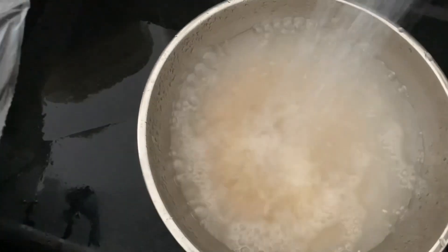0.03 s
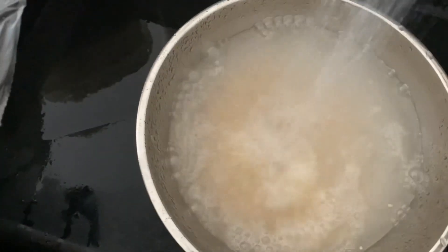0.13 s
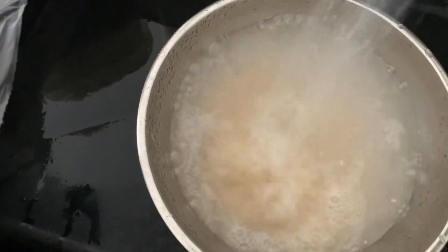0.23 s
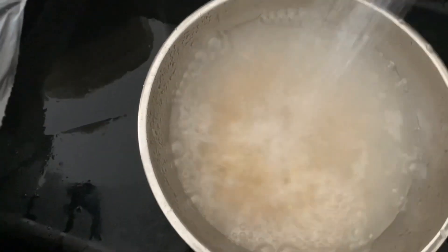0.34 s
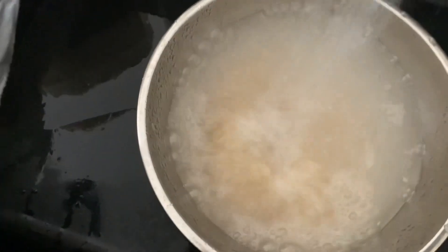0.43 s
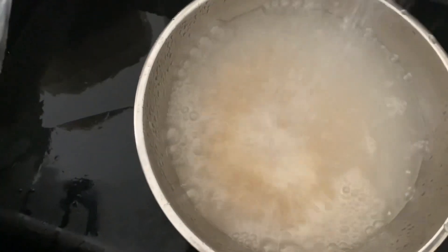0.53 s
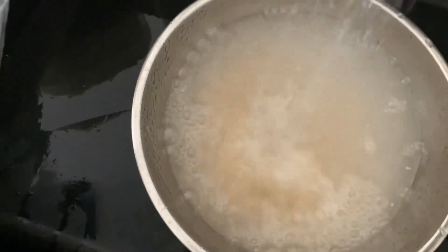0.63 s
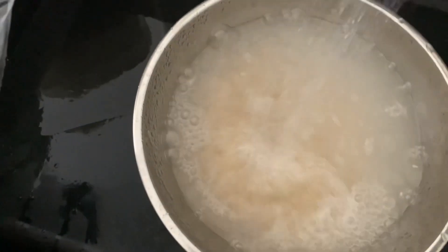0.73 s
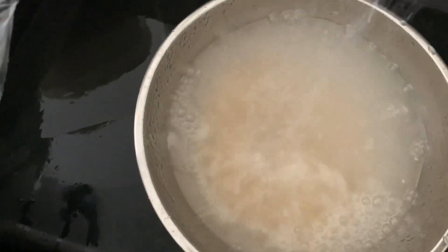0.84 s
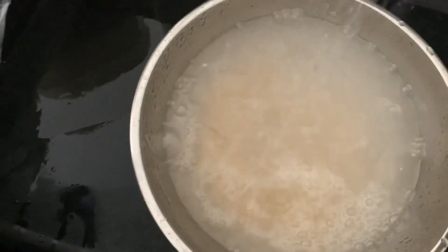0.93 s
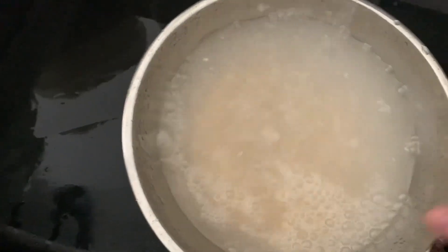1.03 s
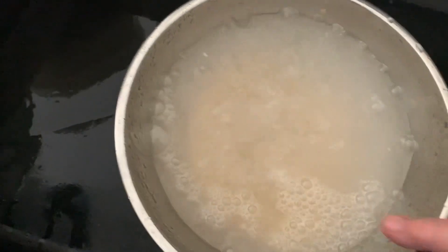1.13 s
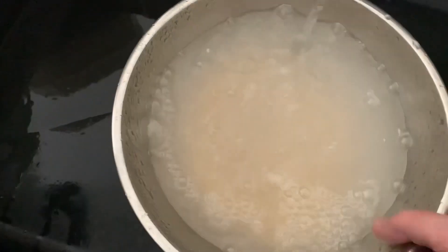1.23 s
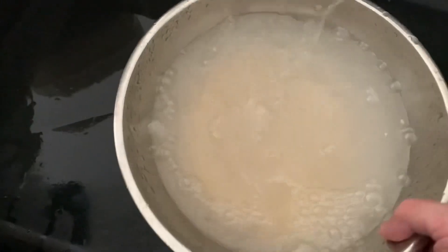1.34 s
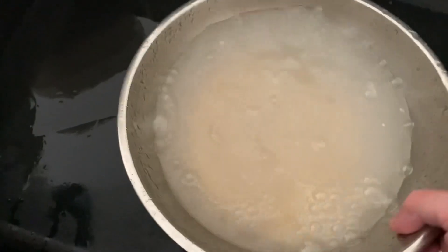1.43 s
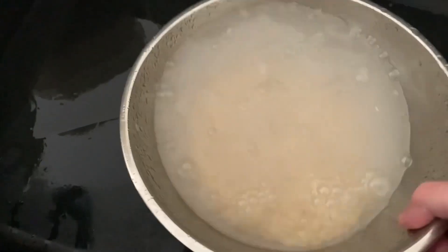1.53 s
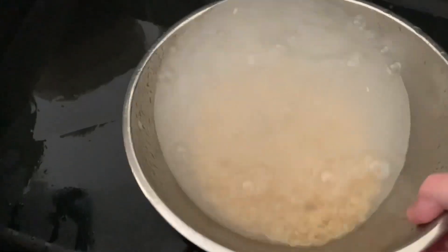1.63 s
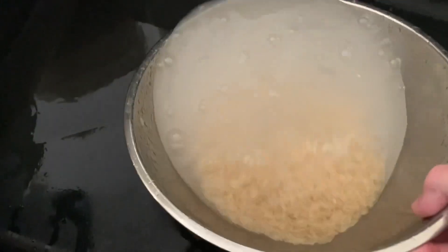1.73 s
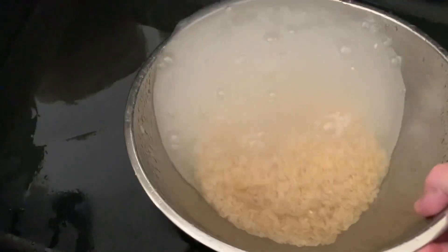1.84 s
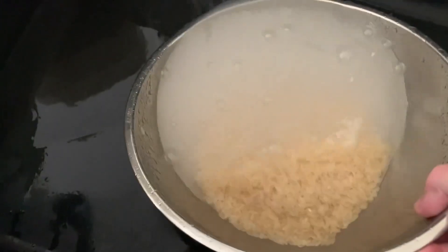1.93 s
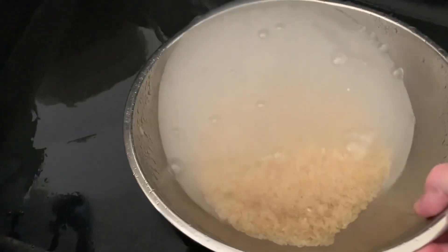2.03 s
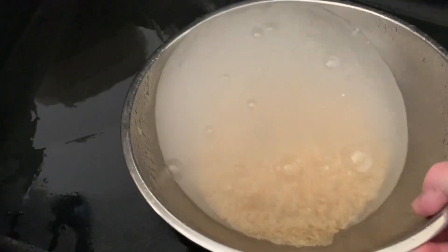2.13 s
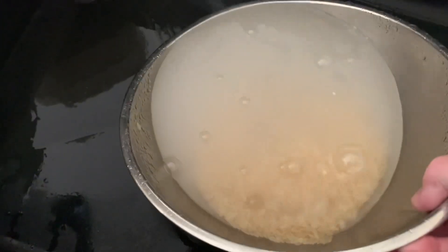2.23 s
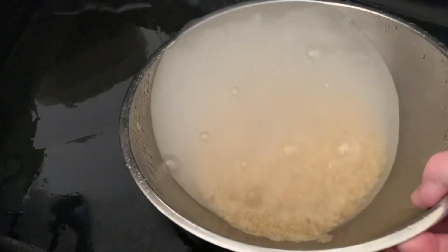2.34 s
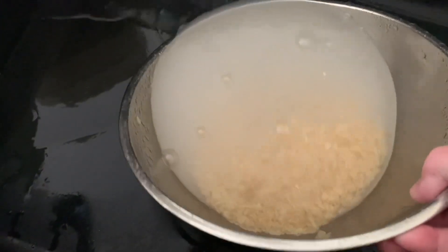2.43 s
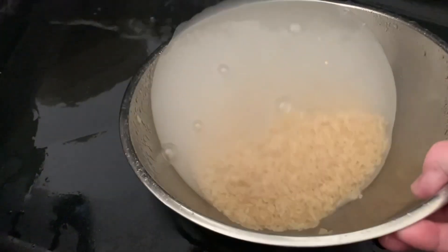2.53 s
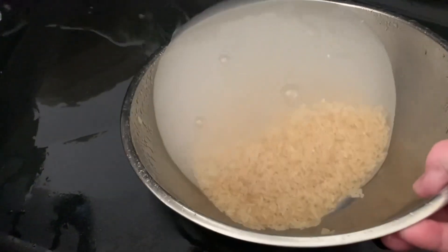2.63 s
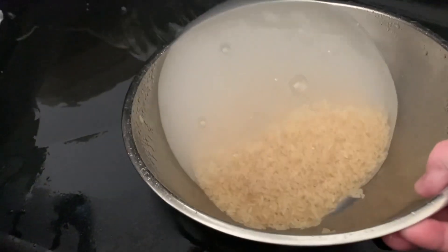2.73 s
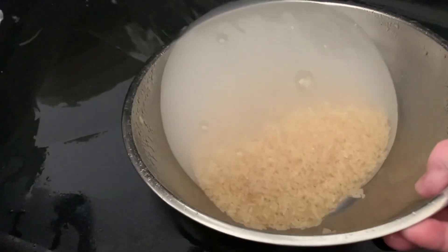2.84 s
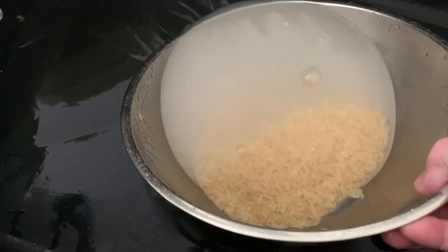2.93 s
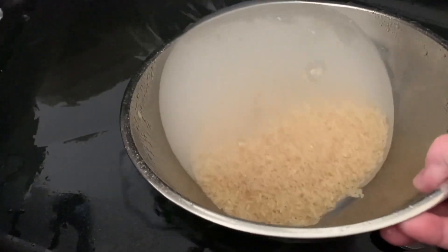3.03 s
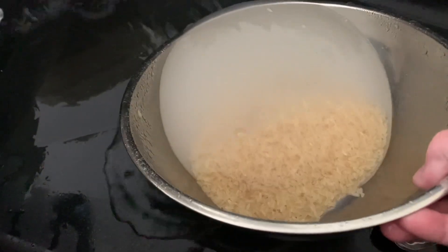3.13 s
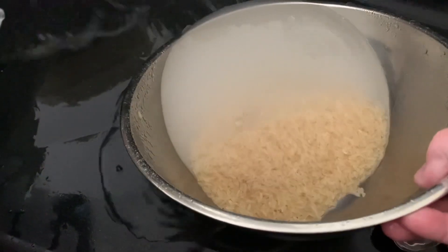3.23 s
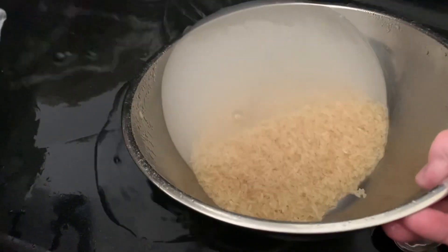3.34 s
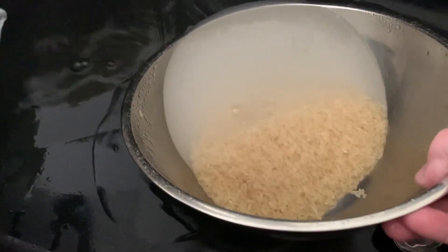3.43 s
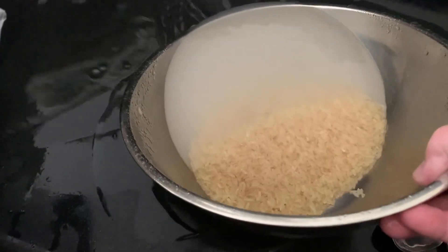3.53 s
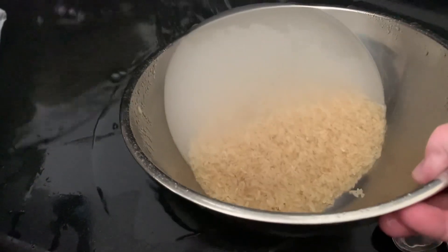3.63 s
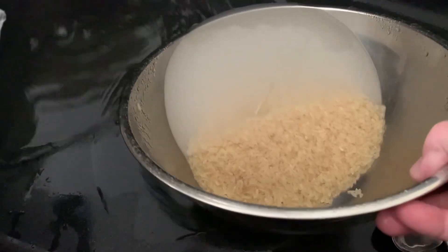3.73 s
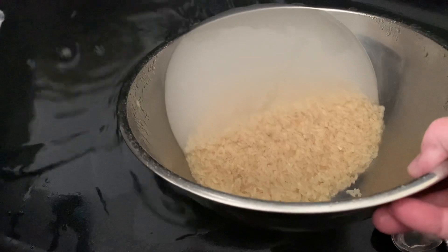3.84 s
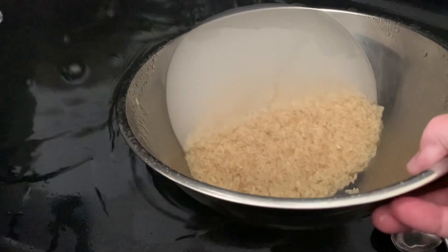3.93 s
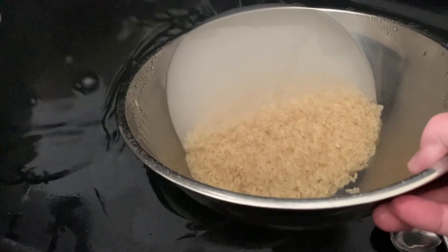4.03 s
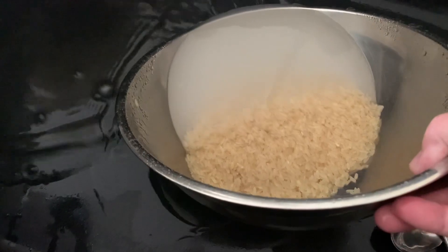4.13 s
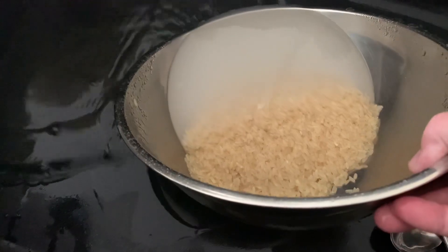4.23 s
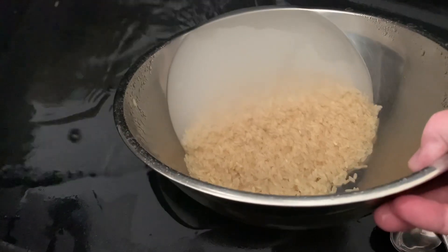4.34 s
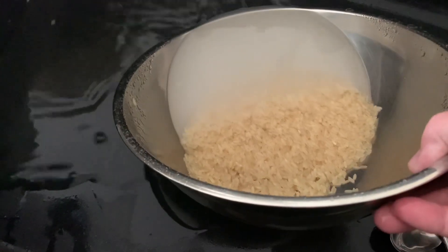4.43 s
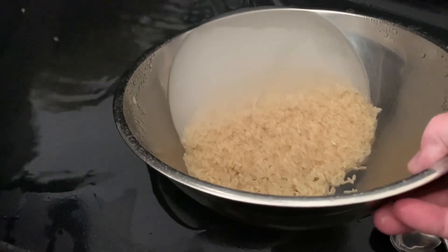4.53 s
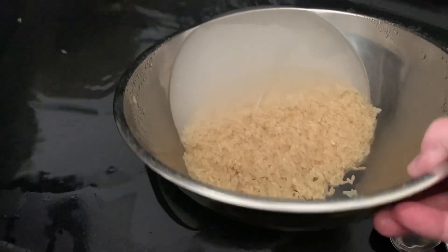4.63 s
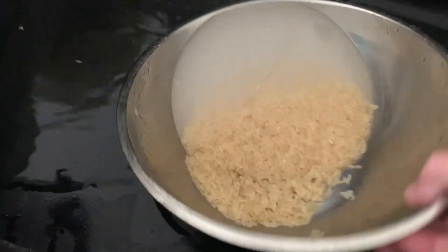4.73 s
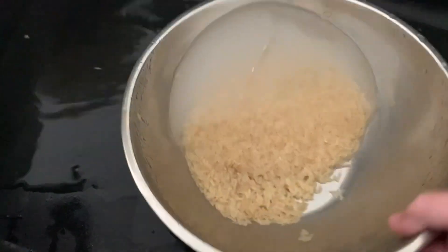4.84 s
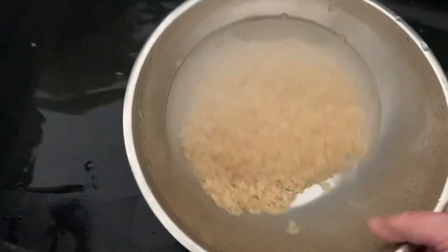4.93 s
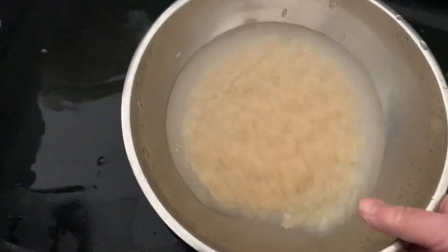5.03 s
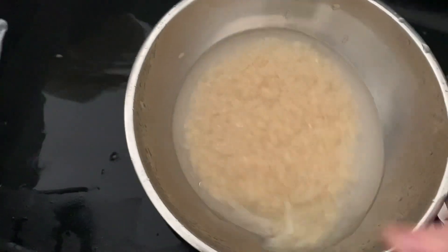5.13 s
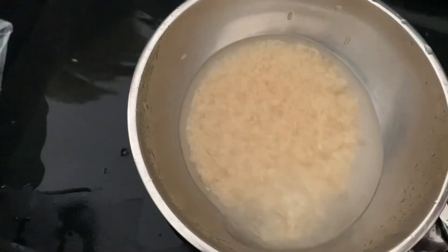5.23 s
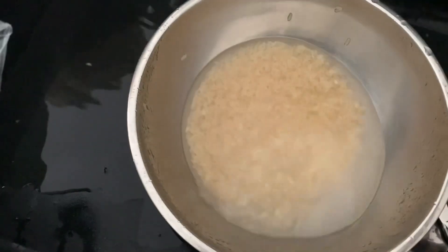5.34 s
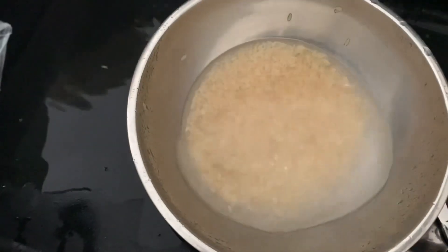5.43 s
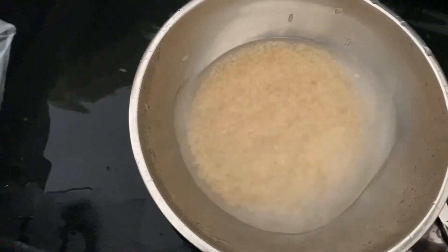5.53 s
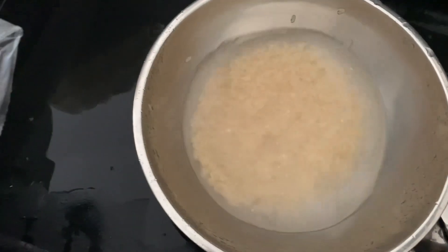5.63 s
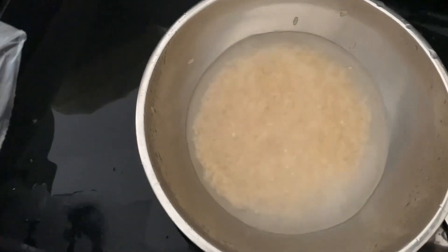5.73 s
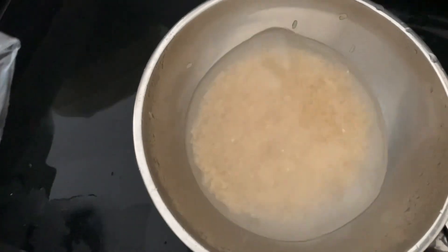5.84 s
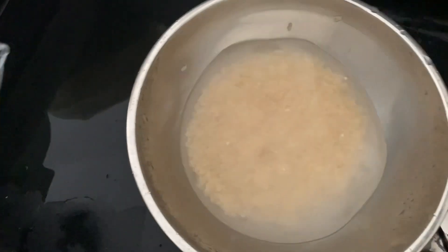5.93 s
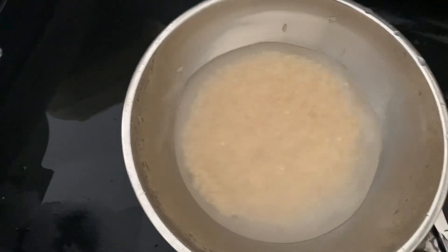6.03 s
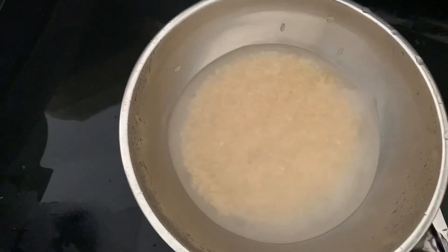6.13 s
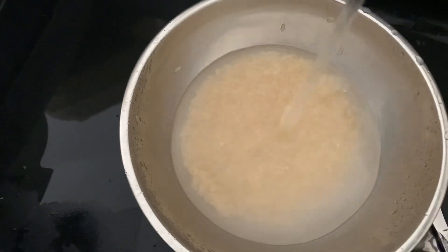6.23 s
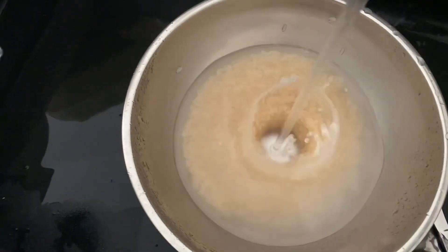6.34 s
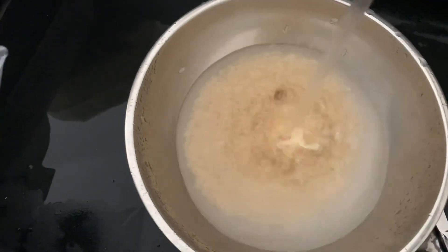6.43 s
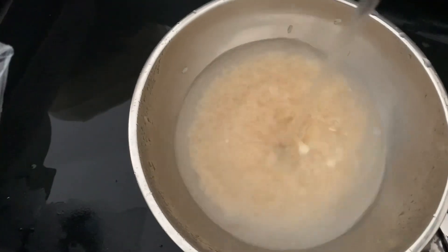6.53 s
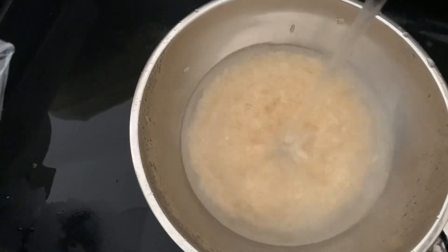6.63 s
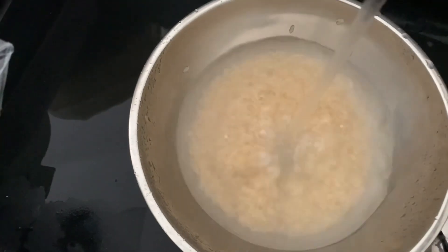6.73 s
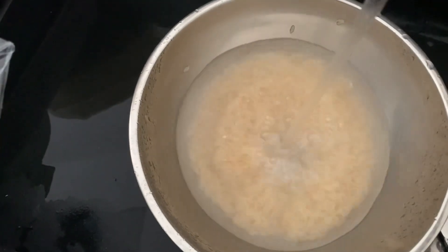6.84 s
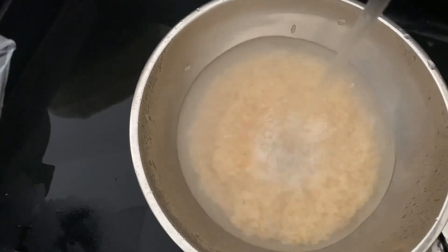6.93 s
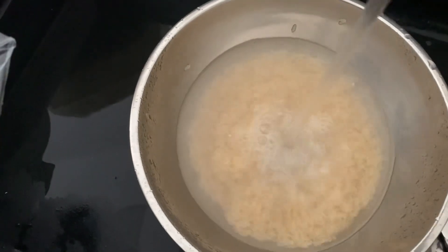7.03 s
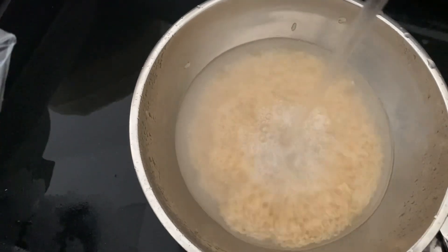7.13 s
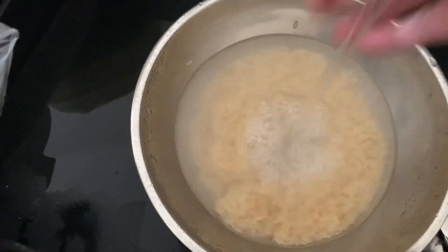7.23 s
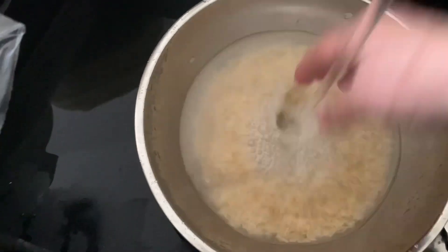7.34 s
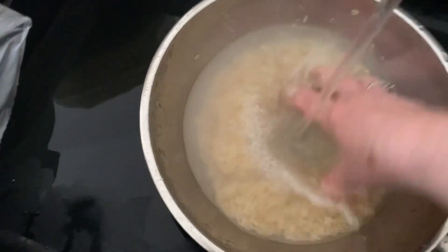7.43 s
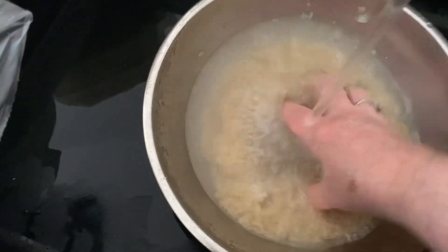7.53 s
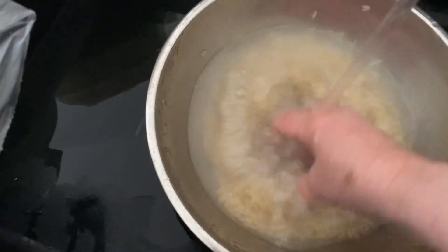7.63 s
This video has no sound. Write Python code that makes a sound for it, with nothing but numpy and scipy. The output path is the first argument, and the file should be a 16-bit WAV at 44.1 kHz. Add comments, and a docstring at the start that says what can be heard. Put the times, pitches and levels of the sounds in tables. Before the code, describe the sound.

Bubbly tap water fills a metal bowl and shuts off; quiet draining drips and foam pops, a bowl clunk, then a fresh jet and hand splashes.

```python
"""A tap pours into a steel bowl of rice and water, bubbles over froth, and closes amid a knock and smacks.
Foam fizzes out; the tipped bowl dribbles into the sink: ringing plops, gurgles, foam pops, shifting grains.
The bowl is set down, a decaying ring over a noise thud; the tap then spits and pours on shallow rice.
A hand plunges into that jet, with louder bubbles, splashes and a jolt of the bowl.
Throughout, a fan hums and hisses in filtered noise, and short noise tails answer as a small kitchen."""
import sys
import numpy as np
from scipy import signal
from scipy.fft import rfft, irfft, next_fast_len
from scipy.io import wavfile
from scipy.ndimage import map_coordinates

SR = 44100
rng = np.random.default_rng(int(sys.argv[2]) if len(sys.argv) > 2 else 0)


def digitize_waveform(pressure):
    """Quantize a signal to 16-bit integers and store it at the path in sys.argv[1].

    Rows of a 2-D input are taken as channels; values are limited to [-1, 1].
    """
    field = np.atleast_2d(pressure).T
    bounded = np.clip(field, -1, 1)
    quanta = np.round(bounded * 32767).astype(np.int16)
    wavfile.write(sys.argv[1], SR, quanta)


N = 339129
TIME = np.arange(N) / SR

# colour of the pour into the deep bowl: (frequency [Hz], relative level per Hz [dB])
DEEP_COLOUR = [(90, 9.5), (200, -2.5), (280, -7), (400, -8.5), (1500, 0.5), (1900, -4.5), (2500, -0.5),
               (4000, 5), (5500, 4), (7500, 6.5), (12000, 6), (15500, 2)]
# colour of the pour onto shallow rice: (frequency [Hz], relative level per Hz [dB])
SHALLOW_COLOUR = [(90, 8), (250, 0.5), (500, -1.5), (1500, -1), (3200, 3.5), (5000, -0.5), (6450, 3.5),
                  (7200, 0.5), (10000, -5.5), (12600, -5.5), (15500, -13)]
# resonances and dips of the bowl and the sink: (centre [Hz], width [Hz], lift [dB])
HOLLOW_MODES = [(480, 164, 10), (930, 52, 4.5), (1183, 49, 5), (1490, 240, 7.5), (1890, 90, -5),
                (2057, 79, 5.5), (3040, 110, -6.5)]
# bubbles trapped by a drop, the jet or the hand: (time [s], peak before trim [dB], starting pitch [Hz])
PLOP_HITS = [(0.688, -24.5, 1226), (0.745, -25.5, 2400), (0.772, -21.5, 1268), (0.954, -24.5, 1453),
             (0.988, -30, 1500), (1.032, -33, 1395), (1.14, -31, 1127), (1.288, -28, 1340),
             (2.029, -40, 1740), (2.766, -25, 1264), (2.795, -26.5, 1490), (2.862, -41.5, 730),
             (3.549, -39, 1620), (4.021, -33, 950), (4.09, -39, 935), (4.11, -35.5, 1650),
             (4.208, -31, 1130), (4.212, -32, 1646), (4.278, -34, 946), (4.288, -38, 695),
             (4.316, -34, 716), (4.345, -32.5, 1090), (4.373, -32, 1020), (4.413, -35.5, 570),
             (4.427, -34, 977), (4.527, -37.5, 853), (4.823, -36, 1106), (4.945, -32, 360),
             (6.324, -16.5, 1233), (6.78, -22, 2620), (6.799, -25.5, 2040), (6.919, -26.5, 2064),
             (7.177, -23.5, 940), (7.298, -23.5, 2830), (7.352, -12.5, 3400), (7.374, -17.5, 1512),
             (7.479, -25, 1351), (7.631, -23, 1630)]
# foam bubbles and droplets ticking on the steel: (time [s], peak before trim [dB], starting pitch [Hz])
TICK_HITS = [(1.004, -21, 10500), (1.269, -31, 7400), (1.705, -46, 12200), (1.924, -31.5, 4970),
             (2.029, -35, 7400), (2.2303, -36.5, 6830), (2.571, -38, 10700), (2.7658, -29.5, 3420),
             (2.904, -32, 5250), (3.215, -31.5, 5960), (3.232, -36.5, 4630), (3.637, -46, 11000),
             (3.812, -35.5, 3500), (3.8918, -33, 4120), (4.023, -33.5, 6730), (5.032, -31, 6060),
             (6.235, -31, 12000), (7.317, -18, 11390)]
# water smacking the surface or the hand: (time [s], peak before trim [dB], noise centre [Hz])
SMACK_HITS = [(0.533, -13.5, 3470), (1.2305, -8, 6900), (4.527, -37, 2000), (6.2824, -14.5, 5500),
              (6.324, -13.5, 2400), (7.35, -11, 3800), (7.372, -16, 2800)]
# bowl bumping the sink and rebounding, or jolted by the hand:
# (time [s], peak before trim [dB], thud against ring before trim [dB])
KNOCK_HITS = [(0.452, -21, 5), (4.801, -30.5, -28), (4.823, -33, -20), (5.812, -20, -9.5), (7.425, -21, 2)]
# modes of the loaded bowl: (frequency [Hz], level before random scatter [dB], t60 [s])
BOWL_MODES = [(197, -2.5, 0.11), (376, 0.5, 0.074), (445, 1.5, 0.11), (593, 1, 0.037), (680, 0, 0.067)]
# colour of the fan's rumble: (frequency [Hz], relative level [dB])
RUMBLE_COLOUR = [(20, -54), (45, -16), (70, -10), (105, -1), (165, -2.5), (260, -18), (350, -20),
                 (500, -42)]
# colour of the fan's air: (frequency [Hz], relative level [dB])
HISS_COLOUR = [(100, -21), (330, 1), (460, 8.5), (650, -1), (900, 2), (1200, 0), (1700, 4.5), (2600, -1.5),
               (4100, -12), (5100, -10.5), (6000, -12.5), (7200, -17), (9000, -22), (15500, -57)]
# gain of the rumble and drone over time: (time [s], gain before trims [dB])
RUMBLE_GAIN = [(0, -47.5), (1.5, -43.5), (3.1, -44), (6.15, -39), (6.7, -40)]
# decay of the room: (frequency [Hz], t60 [s])
ROOM_DECAY = [(150, 0.29), (1000, 0.095), (4000, 0.091), (14000, 0.062)]
# gain of the room's answer: (frequency [Hz], gain [dB])
ROOM_GAIN = [(100, -18.5), (280, -11), (600, -1), (1200, -4.5), (2200, -2.5), (3500, -3), (6500, -5.5),
             (12000, -11)]
# stereo tilt of the microphone: (frequency [Hz], left minus right [dB])
STEREO_LIFT = [(40, -2), (125, 4.5), (300, 2), (1200, 2), (4000, -0.5)]
# the flow to this power is the gain of one bubble size: [large, small, spray]
FLOW_EXPONENTS = [2.0, 1.4, 0.97]
# foam fizzing out after the pour, then wet rice shifting as the bowl is tipped and levelled:
# (time [s], level [dB], rise [s], settling [s])
FIZZ_AND_RICE = [(1.25, -51.5, .15, .55), (2.851, -57.5, .15, .5), (4.76, -52, .1, .13),
                 (5.01, -50.5, .12, .07)]
# bubble runs from the thinning jet, the sloshing, the filling pool and the splashing hand:
# (start [s], length [s], peak before scatter [dB], first pitch [Hz], last pitch [Hz], before scatter)
GURGLE_RUNS = [(.87, 0.17, -35, 1244, 1477), (1.057, 0.068, -36, 2180, 1490), (5.01, .09, -42, 520, 615),
               (6.769, 0.16, -33.5, 2000, 2630), (7.14, 0.069, -32, 1040, 863),
               (7.335, .055, -23, 1864, 1505), (7.455, 0.046, -28.5, 945, 1550),
               (7.55, 0.12, -26, 1100, 1500)]
# flurries of fainter foam bubbles while the bowl is tipped:
# (start [s], length [s], peak before scatter [dB])
FOAM_RUNS = [(1.803, .38, -42.5), (2.681, 0.35, -39), (3.1, 0.93, -45)]

CLOSE_S, SHUT_S = .47, 1.2  # the tap starts closing, and is shut
SPIT_S, SPIT_DB, SPIT_DECAY_S = 6.25, -7.5, .035  # the opening tap spits once
LAND_S, JET_RISE_S = 6.322, .022  # then the full jet lands
BARE_DB, COVER_S = [3.5, 4, 11], .43  # lift on bare rice (large, small, spray), gone once a pool covers it
HAND_S, REACH_S, HAND_DB = 7.15, .42, [3, 4.5, 3.5]  # hand enters the jet; lift (large, small, spray)
GURGLES_PER_S, GURGLE_SCATTER_DB, GURGLE_OCTAVES = 110, 1, .16
POPS_PER_S, POP_SCATTER_DB, POP_HZ, POP_OCTAVES = 42, 2.5, 5370, 0.553
TOP_HZ = 15850  # upper limit of the microphone


def amp(db):
    """Decibels to gain."""
    return 10 ** (np.asarray(db) / 20)


def unit(x):
    """Scaled to rms 1."""
    return x / np.sqrt(np.mean(x ** 2) + 1e-20)


def along(points, hz):
    """A frequency curve read on a log axis."""
    f, v = np.transpose(points)
    return np.interp(np.log(hz + 1), np.log(f + 1), v)


def wobble(rate):
    """A smooth random curve, rate knots a second."""
    return map_coordinates(rng.standard_normal(int(N * rate / SR) + 4), [TIME * rate])


def ramp(start_s, length_s):
    """Rises steadily from 0 to 1 over the given time."""
    return np.clip((TIME - start_s) / length_s, 0, 1)


def swell(s, rise_s, fall_s):
    """A gain that grows to 1 at time s and dies away."""
    return np.exp(-np.maximum((s - TIME) / rise_s, (TIME - s) / fall_s))


def filtered(x, response):
    """x shaped by a response of frequency."""
    n = x.shape[-1]
    m = next_fast_len(n + 8192)
    return irfft(rfft(x, m) * response(np.fft.rfftfreq(m, 1 / SR)), m)[..., :n]


def band(hz, lo_hz, hi_hz):
    """A steep band-pass gain."""
    return ((1 + (lo_hz / (hz + 1)) ** 12) * (1 + (hz / hi_hz) ** 12)) ** -.5


def resonance(hz, centre_hz, q):
    """Causal response of one resonance."""
    damping = 1j * hz * centre_hz / q
    return damping / (centre_hz ** 2 - hz ** 2 + damping)


def add(track, s, db, sound):
    """Mixes a sound into the track at time s with the given peak level."""
    part = track[max(round(s * SR), 0):][:len(sound)]
    part += (amp(db) * sound / np.abs(sound).max())[:len(part)]


def scatter(start_s, length_s, per_s):
    """Uneven times one after another through a stretch, each with normal draws for size and pitch."""
    count = max(round(length_s * per_s), 1)
    times = start_s + length_s * (np.arange(count) + rng.random(count)) / count
    return zip(times, *np.clip(rng.standard_normal((count, 2)), -2, 2).T)


def bubble(t, hz, cycles, rise):
    """A bubble rings for some cycles, its pitch rising as it nears the surface."""
    age = t * hz / cycles
    phase = 2 * np.pi * hz * t * (1 + rise * np.minimum(age, 2) / 2)
    return np.sin(phase) * np.exp(-2 * age)


def burst(t, centre_hz, q, attack, t60, tail_db, tail_t60):
    """A short swell of noise and its weaker tail in one resonance."""
    decay = amp(-60 * t / t60) + amp(tail_db - 60 * t / tail_t60)
    envelope = decay * (1 - np.exp(-(t / attack) ** 2))
    noise = envelope * rng.standard_normal(len(t))
    return filtered(noise, lambda hz: resonance(hz, centre_hz, q))


def ping(t, hz, crack_db=1):
    """A tiny bubble bursting: a broad crack and a short high note."""
    ring = bubble(t, hz, cycles=15.0, rise=0.028) * (1 - np.exp(-(t / .001) ** 2))
    crack = burst(t, hz, q=1.04, attack=0.0016, t60=0.006, tail_db=-20, tail_t60=0.044)
    return unit(ring) + amp(crack_db) * unit(crack)


def swarm(flow, lo_hz, hi_hz, rate, cycles, spread_db, rise):
    """Bubbles across a pitch range, equally strong per Hz; the weaker the flow, the fewer are born."""
    busy = flow / flow.max()
    total = np.cumsum(busy)
    when, pitch, size = rng.random((int(rate * total[-1] / SR), 3)).T
    start = np.searchsorted(total, when * total[-1])
    hz = lo_hz * (hi_hz / lo_hz) ** pitch
    k = np.arange(int(2 * cycles * SR / lo_hz))
    size_gain = amp(-spread_db * np.log(1 - .97 * size))
    strength = hz * size_gain / np.sqrt(busy[start])
    rings = strength[:, None] * bubble(k / SR, hz[:, None], cycles, rise)
    rings *= 1 - np.exp(-k / SR * hz[:, None])  # a bubble takes a cycle to start
    x = np.bincount((start[:, None] + k).ravel(), rings.ravel(), N)[:N]
    return x * np.sqrt(total[-1] / np.sum(x ** 2 * busy))  # rms 1, weighted by the flow


def tap_closing():
    """Gains of large bubbles, small bubbles and spray: as the flow drops, the large ones fade fastest."""
    flow = 1 - ramp(CLOSE_S, SHUT_S - CLOSE_S)
    return [flow ** power for power in FLOW_EXPONENTS]


def hollow(hz):
    """Lift in dB of the air in the bowl and the sink."""
    return sum(db / (1 + (2 * (hz - centre) / width) ** 2) for centre, width, db in HOLLOW_MODES)


def pour(gains, colour, bubbles_per_s, large_db, small_db, spray_db, froth_db, flutter_db):
    """The jet drags air under: large bubbles gurgle, small ones fizz, spray crackles, all on noise froth."""
    gurgle, fizz, hiss = gains
    large = swarm(gurgle, 254.4, 1130, rate=bubbles_per_s / 4, cycles=8, spread_db=3.6, rise=0.16)
    small = swarm(fizz, 900, 5000, rate=bubbles_per_s, cycles=20, spread_db=4.1, rise=.08)
    spray = swarm(hiss, 4200, 16000, rate=5000, cycles=14, spread_db=4.5, rise=.06)
    # grains, gain, band edges in Hz, level in dB
    sizes = [(large, gurgle, 110, 1000, large_db),
             (small, fizz, 1000, 4600, small_db),
             (spray, hiss, 4600, 17000, spray_db)]
    surge = wobble(35)  # the jet breaks up unevenly, and bubbles of one size come in clusters
    out = np.zeros(N)
    for grains, gain, lo, hi, db in sizes:
        shape = lambda hz: amp(along(colour, hz) + hollow(hz)) * band(hz, lo, hi)
        rings, froth = filtered(np.array([grains, rng.standard_normal(N)]), shape)
        rings *= np.sqrt((hi - lo) / (SR / 2))  # the froth noise spans the full bandwidth
        water = (rings + amp(froth_db) * froth) / np.std(froth)
        out += gain * amp(db + flutter_db * (surge + wobble(50))) * water
    return out


def fan(rumble_db=-1, hum_db=-4.0, hiss_db=-47.5):
    """Low rumble with a droning duct resonance, under a steady hiss of air."""
    rumble = filtered(rng.standard_normal(N), lambda hz: amp(along(RUMBLE_COLOUR, hz)))
    drone = filtered(rng.standard_normal(N), lambda hz: resonance(hz, centre_hz=124.3, q=6.5) ** 2)
    hiss = filtered(rng.standard_normal(N), lambda hz: amp(along(HISS_COLOUR, hz)))
    low = amp(rumble_db) * unit(rumble) + amp(hum_db) * unit(drone)
    low_gain = amp(np.interp(TIME, *np.transpose(RUMBLE_GAIN)))
    return low_gain * low + amp(hiss_db) * unit(hiss)


def kitchen(x):
    """Sink and near walls answer differently on each side, as decaying noise tails."""
    hop, out = SR // 5, np.zeros((2, N + SR))
    for start in range(0, N, hop):  # tails are redrawn each 0.2 s to keep the colour even
        hz, t, z = signal.stft(rng.standard_normal((2, SR // 4)), SR, nperseg=256)
        t60 = along(ROOM_DECAY, hz)[:, None]
        tail = signal.istft(z * amp(-60 * t / t60) / np.sqrt(t60), SR, nperseg=256)[1]
        tail /= np.linalg.norm(tail[0])
        answer = signal.fftconvolve(x[None, start:start + hop], tail, axes=1)
        out[:, start:start + answer.shape[1]] += answer
    return filtered(out[:, :N], lambda hz: amp(along(ROOM_GAIN, hz)))


def knocks(knock_db=3, thud_db=4):
    """The water-laden bowl rings briefly over the dull thud of the water in it."""
    out, t = np.zeros(N), np.arange(SR // 4) / SR
    for s, db, depth_db in KNOCK_HITS:
        ring = np.zeros(len(t))
        for hz, level, t60 in BOWL_MODES:
            decay = amp(level + rng.normal(0, 0.95) - 60 * t / t60)
            ring += decay * np.sin(2 * np.pi * (hz * t + rng.random()))
        thud = burst(t, centre_hz=180, q=0.69, attack=0.0054, t60=0.06, tail_db=-26, tail_t60=0.16)
        thud = filtered(thud, lambda hz: band(hz, 70, 640))
        ring = unit(ring) * (1 - np.exp(-t / 0.00057))
        add(out, s, db + knock_db, ring + amp(thud_db + depth_db) * unit(thud))
    return out


def smacks(smack_db=3.0):
    """Water slaps the surface or the hand: a bare crack of noise."""
    out, t = np.zeros(N), np.arange(SR // 6) / SR
    for s, db, hz in SMACK_HITS:
        crack = burst(t, hz, q=0.73, attack=0.0024, t60=0.013, tail_db=-40, tail_t60=0.042)
        add(out, s, db + smack_db, crack)
    return out


def plops(plop_db=2.5, attack_s=0.0013):
    """Each plop is a ringing bubble with a faint splat, two smaller followers and an answer of the steel."""
    out, t = np.zeros(N), np.arange(SR // 6) / SR
    splat_db, follower_db, sink_db = -9, -11, -13
    swelling = lambda age, hz: bubble(age, hz, cycles=14.9, rise=0.13) * (1 - np.exp(-age / attack_s))
    for s, db, hz in PLOP_HITS:
        ring = swelling(t, hz)
        for late, detune in rng.random((2, 2)):
            follower_age = np.maximum(t - 0.012 * late, 0)
            ring += amp(follower_db) * swelling(follower_age, hz * 0.67 * 2 ** detune)
        splat = burst(t, hz, q=2.5, attack=0.0015, t60=0.02, tail_db=-33, tail_t60=0.048)
        sink = swelling(t, 1750 * amp(rng.normal(0, 0.4)))  # the steel answers
        plop = unit(ring) + amp(splat_db) * unit(splat) + amp(sink_db) * unit(sink)
        add(out, s, db + plop_db, plop)
    return out


def gurgles(cycles=17, glide=0.1, attack_s=0.0018, splat_db=-13):
    """Round bubbles break away in turn with a wet splat; pitch drifts as the cavity changes size."""
    out, t = np.zeros(N), np.arange(SR // 10) / SR
    for start_s, length_s, db, first_hz, last_hz in GURGLE_RUNS:
        for s, size, pitch in scatter(start_s, length_s, GURGLES_PER_S):
            drift_hz = np.interp(s, [start_s, start_s + length_s], [first_hz, last_hz])
            hz = drift_hz * 2 ** (GURGLE_OCTAVES * pitch)
            ring = bubble(t, hz, cycles, glide * rng.random()) * (1 - np.exp(-t / attack_s))
            splat = burst(t, hz, q=1.1, attack=0.0019, t60=0.019, tail_db=-20, tail_t60=0.062)
            add(out, s, db + GURGLE_SCATTER_DB * size, unit(ring) + amp(splat_db) * unit(splat))
    return out


def ticks(tick_db=4):
    """Foam bubbles and droplets tick on the steel: a ping and a crack."""
    out, t = np.zeros(N), np.arange(SR // 6) / SR
    for s, db, hz in TICK_HITS:
        add(out, s, db + tick_db, ping(t, hz))
    return out


def fizz_and_rice(slide_db=2):
    """Foam fizzes out, then wet grains slide over the steel: faint crackle and noise in one resonance."""
    activity = sum(amp(db) * swell(s, rise_s, fall_s) for s, db, rise_s, fall_s in FIZZ_AND_RICE)
    crackle = swarm(activity, 3500, 15000, rate=1300, cycles=8, spread_db=6, rise=.02)
    grains = crackle + amp(slide_db) * rng.standard_normal(N)
    return activity * filtered(grains, lambda hz: resonance(hz, centre_hz=6100, q=1.2))


def foam():
    """Tiny bubbles burst in flurries as the water drains out of the rice."""
    out, t = np.zeros(N), np.arange(SR // 20) / SR
    for start_s, length_s, db in FOAM_RUNS:
        for s, size, pitch in scatter(start_s, length_s, POPS_PER_S):
            add(out, s, db + POP_SCATTER_DB * size, ping(t, POP_HZ * 2 ** (POP_OCTAVES * pitch)))
    return out


def tap_opening(spit_rise_s=.005):
    """The same three gains: a spit, then the jet hisses on bare rice, softens in its pool, meets the hand."""
    spit = amp(SPIT_DB) * swell(SPIT_S + spit_rise_s, spit_rise_s, SPIT_DECAY_S)
    jet = 1 - np.exp(-np.maximum(TIME - LAND_S, 0) / JET_RISE_S)
    flow = spit + jet
    bare, hand = 1 - ramp(LAND_S, COVER_S), ramp(HAND_S, REACH_S)
    return [flow * amp(bare_db * bare + hand_db * hand) for bare_db, hand_db in zip(BARE_DB, HAND_DB)]


def scene():
    """Both pours, the draining between them and the fan, in the kitchen."""
    deep = pour(tap_closing(), DEEP_COLOUR, bubbles_per_s=2200, large_db=-35.0, small_db=-30.5,
                spray_db=-28.5, froth_db=-4.0, flutter_db=0.77)
    shallow = pour(tap_opening(), SHALLOW_COLOUR, bubbles_per_s=1750, large_db=-41.0, small_db=-39.5,
                   spray_db=-35.5, froth_db=-2.5, flutter_db=1.12)
    hits = knocks() + smacks() + plops() + ticks()
    direct = deep + shallow + hits + gurgles() + foam() + fizz_and_rice() + fan()
    return direct + kitchen(direct)


def record(dry):
    """The stereo microphone tilts the sides by frequency, delays the left in the treble, cuts the top."""
    lag = lambda hz: 2 * np.pi * np.interp(hz, [0, 4000, 5000, 15700], [0, .17, .5, 3])  # radians
    half = np.array([[.5], [-.5]])  # left and right each take half the difference
    tilt = lambda hz: amp(half * along(STEREO_LIFT, hz))
    return filtered(dry, lambda hz: tilt(hz) * np.exp(-1j * half * lag(hz)) * (hz < TOP_HZ))


dry = scene()
out = record(dry)
digitize_waveform(out)
```